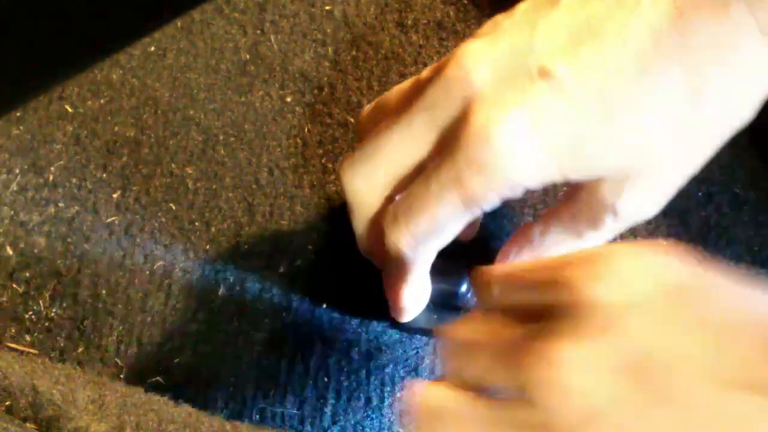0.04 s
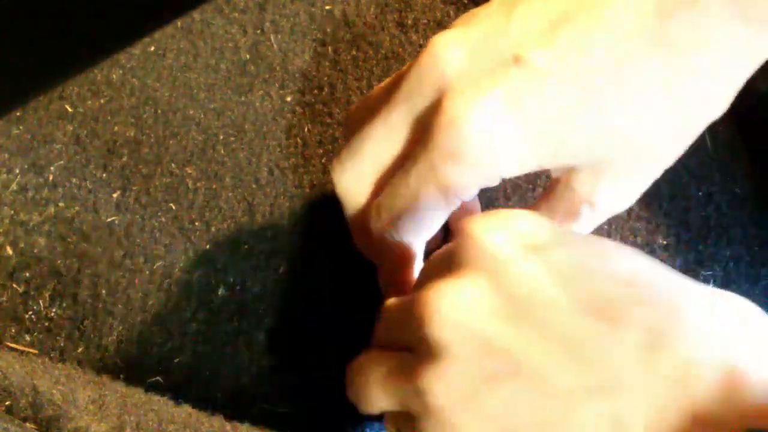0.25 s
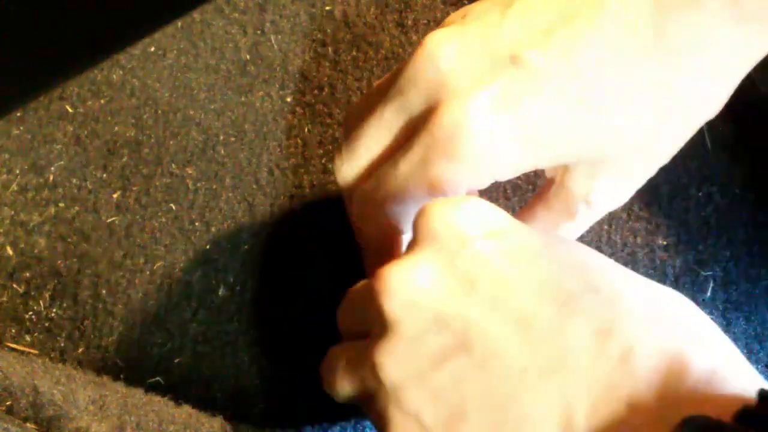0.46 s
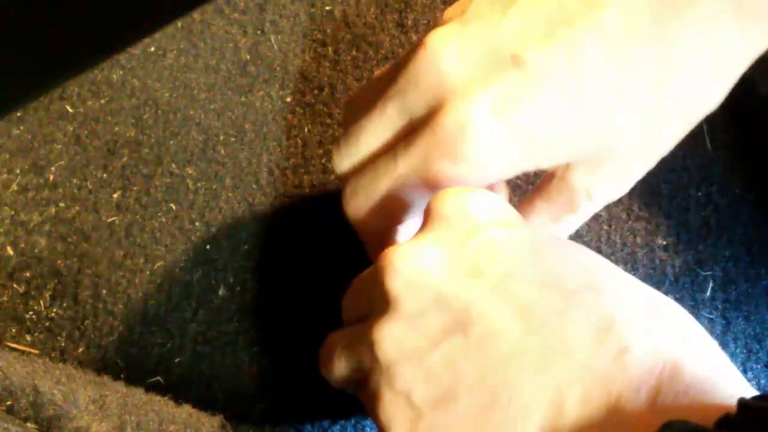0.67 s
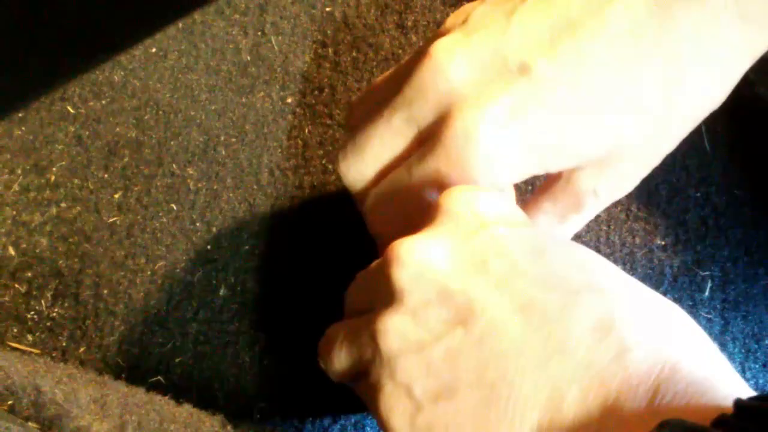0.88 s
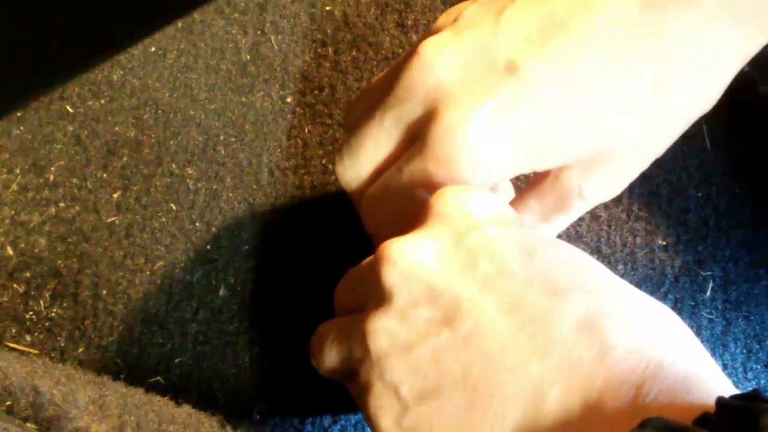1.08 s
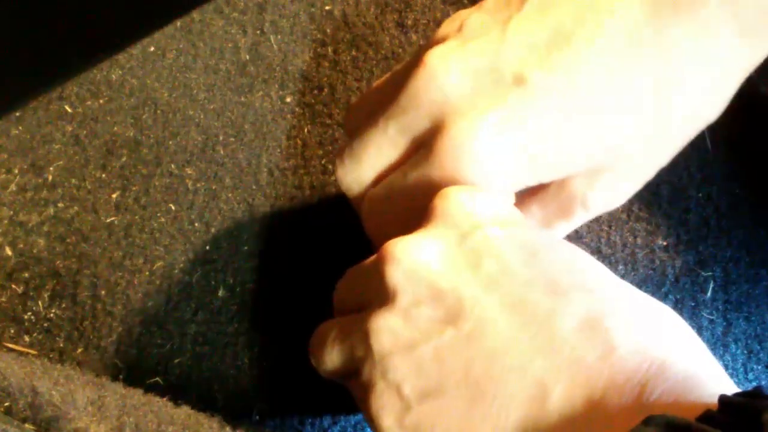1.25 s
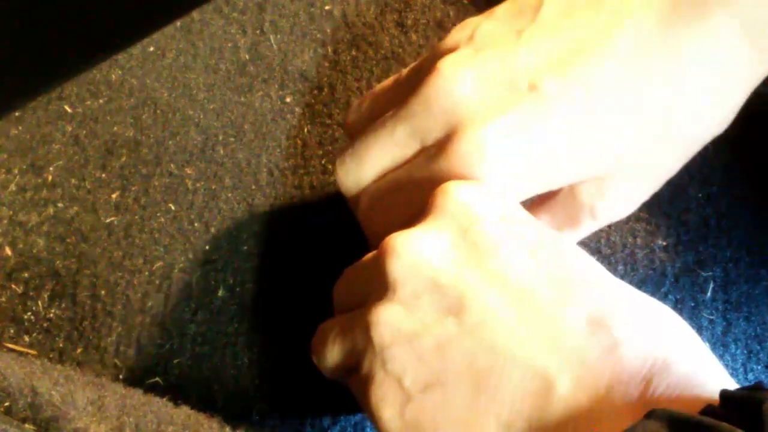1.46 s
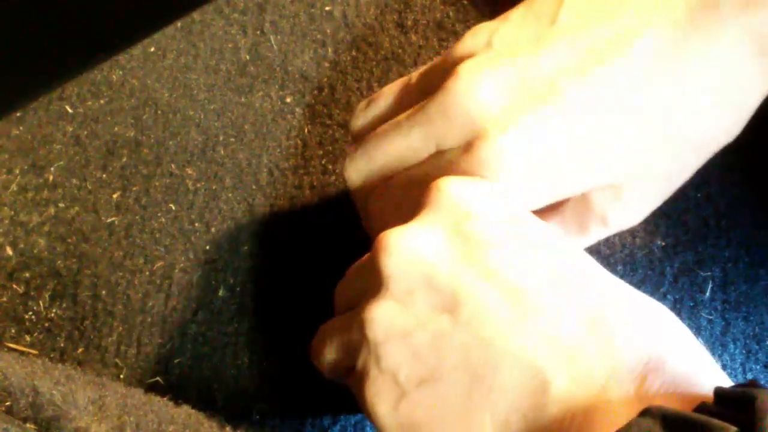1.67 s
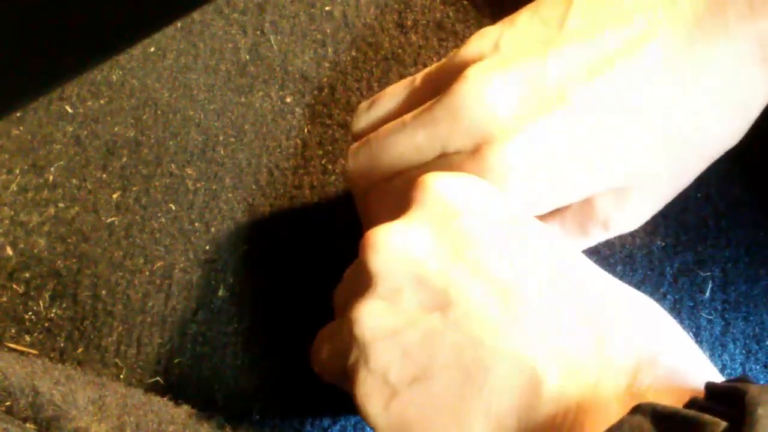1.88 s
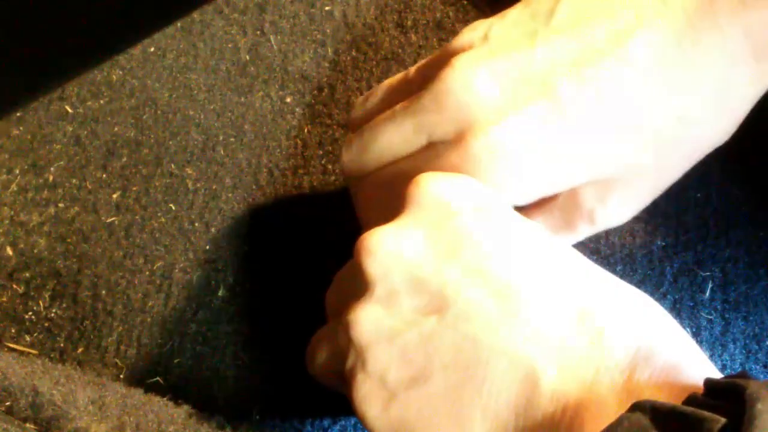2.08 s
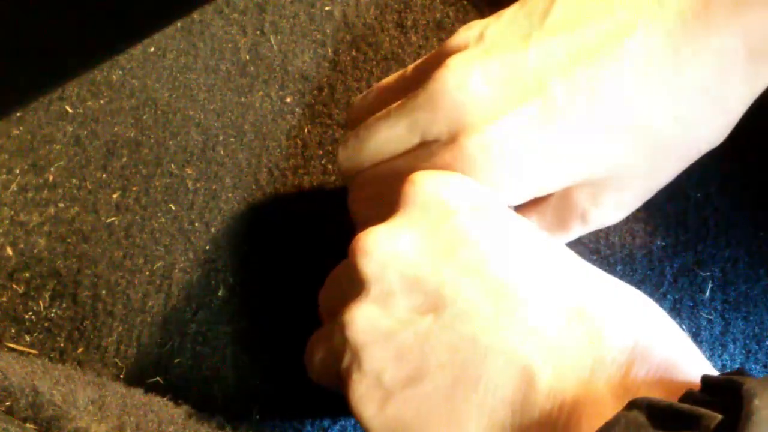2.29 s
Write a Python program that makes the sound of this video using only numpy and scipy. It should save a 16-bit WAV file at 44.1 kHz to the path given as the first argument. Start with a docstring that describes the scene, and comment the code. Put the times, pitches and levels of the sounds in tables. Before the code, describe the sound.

A toothed plastic piece is rubbed hard into car floor carpet, a dense bright crackle with scratchy teeth, fading within half a second to faint twists, soft knocks and fibre ticks; close, dry, mono.

```python
"""A plastic gripper is pressed and twisted into car floor carpet, heard close up.
At first pile fibres slip in a bright dense crackle, teeth scratch and the body rings, over a dull rub.
Then the rubbing fades to small twists, with a few dull knocks and, later, single fibre snaps.
Cabin rumble and faint hiss lie beneath throughout. Crackle, scratch, rub and rumble are shaped noise;
the body is noise clicks through resonances, and the knocks are short decaying sines."""
import sys
import numpy as np
from scipy import signal
from scipy.fft import rfft, irfft, next_fast_len
from scipy.io import wavfile

SR = 44100
rng = np.random.default_rng(int(sys.argv[2]) if len(sys.argv) > 2 else 0)


def bounce(signal):
    """Save signal as a 16-bit WAV file at the path given by the first command-line argument."""
    frames = np.transpose(np.atleast_2d(signal))
    limited = np.clip(frames, -1, 1)
    pcm = np.round(limited * 32767).astype(np.int16)
    wavfile.write(sys.argv[1], SR, pcm)


N = 102797  # samples

# Course of the rubbing: t/s, fibre crackle level/dB, teeth scratch level/dB, gripper body level/dB,
# dull rub through the floor level/dB
RUBBING = [(0.0, -29, -39.5, -41, -62), (0.036, -30.5, -38.5, -41.5, -66.5),
           (0.056, -33, -43.5, -40.5, -68.5), (0.082, -35.5, -44, -45.5, -67), (0.1, -34, -44.5, -42, -67),
           (0.17, -30.5, -38, -46, -66), (0.186, -34.5, -44, -50, -79), (0.216, -39.5, -49.5, -54, -72),
           (0.28, -38.5, -49.5, -54, -71.5), (0.41, -40, -56.5, -61.5, -72.5),
           (0.454, -40, -57.5, -58, -73), (0.52, -44, -64.5, -66, -74), (0.62, -49, -73, -74.5, -81),
           (0.662, -45, -75, -76.5, -82), (0.73, -53.5, -78, -77.5, -75.5), (0.786, -51, -74, -79, -74.5),
           (0.828, -50.5, -82, -81, -72), (0.874, -60, -89, -89, -86.5), (0.922, -52.5, -76, -85, -81.5),
           (0.948, -58, -85, -87, -89), (0.998, -50, -87, -89, -85.5), (1.046, -58.5, -85, -86, -91.5),
           (1.072, -50.5, -77, -83.5, -82), (1.144, -50, -76, -73.5, -79.5), (1.18, -53, -77, -82.5, -80),
           (1.245, -60, -89, -89, -89), (1.29, -56, -81, -89, -84), (1.314, -61.5, -90, -92, -90),
           (1.45, -59.5, -81, -88, -89), (1.5, -58, -83, -85, -83.5), (1.564, -55.5, -82, -82, -82),
           (1.606, -53.5, -76, -82.5, -81.5), (1.682, -62, -88, -91, -87.5), (1.89, -62.5, -84, -91, -88.5),
           (1.91, -55.5, -85, -80, -89), (1.93, -65.5, -85, -92, -88), (1.96, -59, -95, -87, -91),
           (1.98, -61, -92, -96, -76), (2.0, -60.5, -93, -88, -84), (2.05, -64, -92, -94, -92),
           (2.14, -72.5, -100, -103, -93), (2.33, -68, -91, -100, -93.5)]
# Colour of the fibre crackle: f/Hz, relative level/dB (per Hz)
FIBRE_COLOUR = [(350, -46.5), (700, -19), (1500, -27.5), (3000, -24.5), (4800, -27), (6000, -13.5),
                (7500, -6.5), (8800, -6), (9600, -3), (10500, 2), (11500, 4), (12500, 1), (13300, -1.5),
                (14600, -0.5), (15700, -6.5), (17000, -12.5)]
# Single fibres letting go: t/s, burst level/dB
FIBRE_SNAPS = [(1.226, -61), (1.268, -54), (1.289, -53.5), (1.4865, -56), (1.51, -54), (1.578, -51),
               (1.584, -53), (1.712, -58), (1.902, -55.5), (1.945, -62.5), (2.2217, -65)]
# Colour of the teeth on the pile: f/Hz, relative level/dB (per Hz)
SCRATCH_COLOUR = [(3000, -21.5), (3900, -10.5), (4300, -3.5), (5000, -1), (5500, 0), (6500, 0),
                  (7500, -7.5), (9000, -17)]
# Resonances of the gripper: f/Hz, width of each of two passes/Hz, relative level/dB,
# level change per dB of harder rubbing/dB
BODY_MODES = [(888, 244, -5.5, 0.), (987, 170, -2.5, 0.32), (1332, 300, 4, 0.1), (1806, 330, -1, -0.19),
              (2068, 180, -1.5, 0.), (2355, 240, -5, 0), (2670, 240, 2, 0.7), (3020, 790, -4, 0.),
              (3760, 910, -11, 0)]
# Soft knocks: t/s, main ring f/Hz, level/dB, upper ring f/Hz, level/dB, low thump level/dB
# ("upper" is only the second ring; it may lie below the main one)
SOFT_KNOCKS = [(.776, 1200, -68, 1005, -66, -76), (.9, 1310, -76, 980, -73, -80),
               (1.13, 1720, -68, 1380, -77, -78), (1.756, 2830, -77, 2850, -89, -93),
               (1.906, 800, -66, 1410, -77.5, -75), (1.973, 860, -66, 1154, -73, -70.5),
               (2.043, 850, -79, 1080, -79, -88)]
# Colour of the dull rub: f/Hz, relative level/dB (per Hz)
DULL_COLOUR = [(71, -38.5), (120, -9.5), (210, 1.5), (311, 2), (446, -3.5), (700, -8.5), (910, -30.5),
               (1540, -120)]
# Colour of the cabin rumble: f/Hz, relative level/dB (per Hz)
RUMBLE_COLOUR = [(15, -28), (28, -23.5), (38, -1), (50, 2), (65, 1.5), (80, -4.5), (100, -2.5), (130, -15),
                 (200, -17), (300, -31)]
# Course of the cabin rumble: t/s, level/dB
RUMBLE_COURSE = [(0, -65.5), (.45, -73), (.62, -75), (.86, -78), (.93, -70), (1.05, -77), (1.4, -78.5),
                 (1.58, -74.5), (1.68, -81), (1.75, -74.5), (2.1, -79), (2.33, -91)]

# Slips at mean crackle level; their rate moves this many dB (20 log) per dB of rubbing
MEAN_SLIPS_PER_S, SLIP_RATE_FOLLOWS, SLIP_SPREAD_DB = 8100, 0.48, 2.5
CLUMP_DB, CLUMP_HZ, FLUTTER_DB, FLUTTER_HZ = 0.78, 390, 0.7, 41  # spread and corner of level drift
SNAP_PEAK_S = 0.0016
TEETH_PER_S, TOOTH_SPREAD_DB = 1500, 2.5  # catches for each body resonance
BODY_WANDER_DB, BODY_WANDER_HZ = 1.52, 12
THUMP_HZ = 474
KNOCK_ATTACK_S, KNOCK_HOLD_S, KNOCK_T60_S = 0.00092, 0.0033, 0.031  # T60 counts from the end of the hold
HISS_DB = -84.5
CUTOFF_HZ = 15740


def fibres(level_db):
    """Pile fibres slip in clumps, packed closer by harder rubbing; snaps are short bursts among them."""
    harder_db = level_db - level_db.mean()
    per_s = MEAN_SLIPS_PER_S * amp(SLIP_RATE_FOLLOWS * harder_db)
    unevenness_db = CLUMP_DB * drift(CLUMP_HZ) + FLUTTER_DB * drift(FLUTTER_HZ)
    slips = grains(per_s, SLIP_SPREAD_DB) * amp(unevenness_db)
    drive = rms_one(slips) * amp(level_db)

    t = np.arange(300) / SR
    snap_shape = (t / SNAP_PEAK_S) * np.exp(1 - t / SNAP_PEAK_S)
    for s, db in FIBRE_SNAPS:
        i = int(s * SR)
        drive[i:i + 300] += amp(db) * rng.standard_normal(300) * snap_shape
    # colouring levels the rms to 1, so the loudness of the drive is put back
    return colour(drive, FIBRE_COLOUR) * np.sqrt(np.mean(drive ** 2))


def gripper(scratch_db, body_db):
    """Teeth scratch the pile; their catches ring each body resonance, which wanders in level."""
    harder_db = np.maximum(body_db - body_db.max(), -30)  # 0 at the hardest rubbing
    body = np.zeros(N)
    for hz, width, db, follows in BODY_MODES:
        catches = grains(TEETH_PER_S, TOOTH_SPREAD_DB)
        ring = resonance(resonance(catches, hz, width), hz, width)
        mode_db = db + follows * harder_db + BODY_WANDER_DB * drift(BODY_WANDER_HZ)
        body += amp(mode_db) * rms_one(ring)
    scratch = colour(grains(9000, spread_db=0.5), SCRATCH_COLOUR)
    return rms_one(body) * amp(body_db) + scratch * amp(scratch_db)


def knocks():
    """Soft contacts: two rings and a low thump swell, hold briefly and die."""
    out = np.zeros(N + 4000)
    t = np.arange(4000) / SR
    swell = 1 - np.exp(-t / KNOCK_ATTACK_S)
    decay = amp(-60 * np.maximum(t - KNOCK_HOLD_S, 0) / KNOCK_T60_S)
    for s, hz, db, upper_hz, upper_db, thump_db in SOFT_KNOCKS:
        partials = [(hz, db), (upper_hz, upper_db), (THUMP_HZ, thump_db)]
        ring = sum(amp(d) * np.sin(2 * np.pi * f * t) for f, d in partials)
        i = int(s * SR)
        out[i:i + 4000] += ring * swell * decay
    return out[:N]


def dull_rub(level_db):
    """Rubbing carried through the floor: dense uneven clicks coloured dark."""
    return amp(level_db) * colour(grains(2500, spread_db=2.5), DULL_COLOUR)


def cabin_rumble():
    """Low cabin rumble: coloured noise with a changing level."""
    level_db, = in_time(RUMBLE_COURSE)
    return amp(level_db) * colour(rng.standard_normal(N), RUMBLE_COLOUR)


def hiss():
    """Steady white noise."""
    return amp(HISS_DB) * rng.standard_normal(N)


def amp(db):
    """Decibels to amplitude."""
    return 10 ** (np.asarray(db) / 20)


def rms_one(x):
    """Scale to rms 1."""
    return x / np.sqrt(np.mean(x ** 2) + 1e-30)


def in_time(rows):
    """Columns of a table as curves in time."""
    s, *columns = np.transpose(rows)
    return [np.interp(np.arange(N) / SR, s, c) for c in columns]


def colour(x, spectrum):
    """Causal (minimum-phase) filter with the given spectrum; rms 1."""
    size = 2 * next_fast_len(N // 2 + 8192)
    hz = np.maximum(np.arange(size // 2 + 1) * SR / size, 1)
    at, db = np.transpose(spectrum)
    log_gain = np.interp(np.log(hz), np.log(at), db) * np.log(10) / 20
    # folding the cepstrum onto positive time makes the phase minimal
    cepstrum = irfft(log_gain, size)
    cepstrum[1:size // 2] *= 2
    cepstrum[size // 2 + 1:] = 0
    response = np.exp(rfft(cepstrum))
    return rms_one(irfft(rfft(x, size) * response, size)[:N])


def drift(corner_hz):
    """Random wander: noise through two equal low-pass poles, rms 1."""
    r = np.exp(-2 * np.pi * corner_hz / SR)
    noise = rng.standard_normal(N + SR)
    return rms_one(signal.lfilter([1], [1, -2 * r, r * r], noise)[SR:])  # skip the settling second


def grains(per_s, spread_db):
    """Random clicks of uneven size and either sign, equal power at any rate."""
    size = amp(spread_db * np.minimum(rng.exponential(1, N), 5)) * rng.choice([-1, 1], N)
    share = np.clip(per_s / SR, 1e-3, 1)  # chance of a click in each sample
    return rms_one(size * (rng.random(N) < share) / np.sqrt(share))


def resonance(x, hz, width):
    """Two-pole band, gain 1 on top."""
    r = np.exp(-np.pi * width / SR)
    feedback = [1, -2 * r * np.cos(2 * np.pi * hz / SR), r * r]
    return signal.lfilter([(1 - r * r) / 2, 0, (r * r - 1) / 2], feedback, x)


def scene():
    """All sources summed to one channel."""
    fibre_db, scratch_db, body_db, dull_db = in_time(RUBBING)
    contact = fibres(fibre_db) + gripper(scratch_db, body_db) + knocks()
    background = dull_rub(dull_db) + cabin_rumble() + hiss()
    return (contact + background)[None]


def record(dry):
    """A steep elliptic low-pass cuts the top."""
    low_pass = signal.ellip(14, .3, 60, CUTOFF_HZ, fs=SR, output="sos")  # ripple/dB, stop-band/dB
    return signal.sosfilt(low_pass, dry)


dry = scene()
out = record(dry)
bounce(out)
```